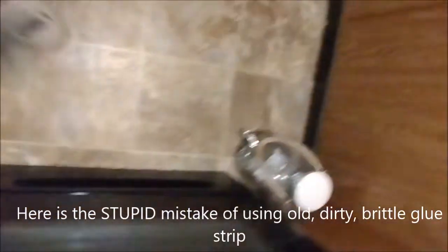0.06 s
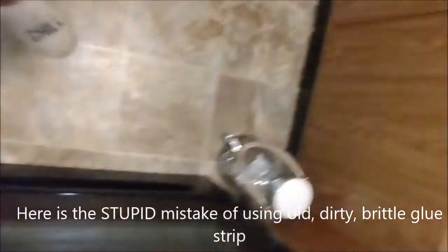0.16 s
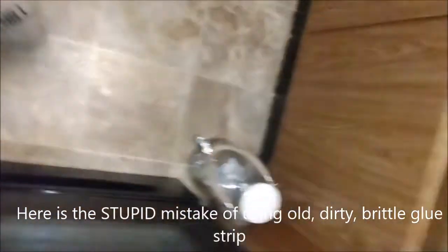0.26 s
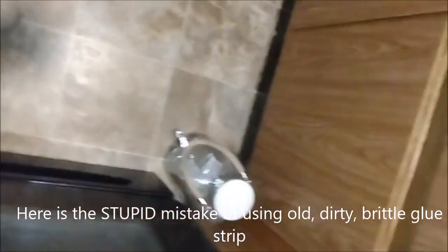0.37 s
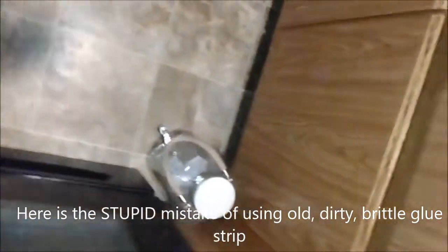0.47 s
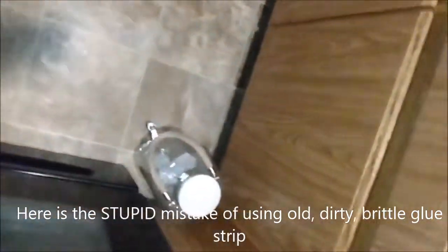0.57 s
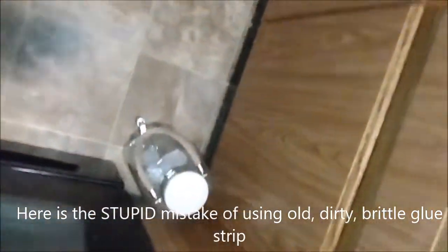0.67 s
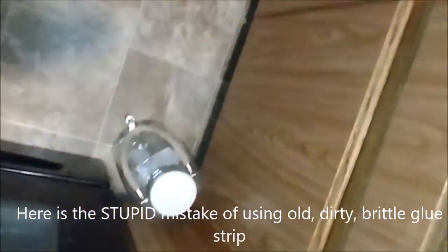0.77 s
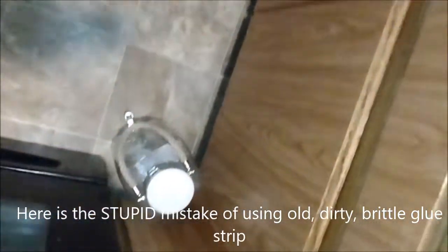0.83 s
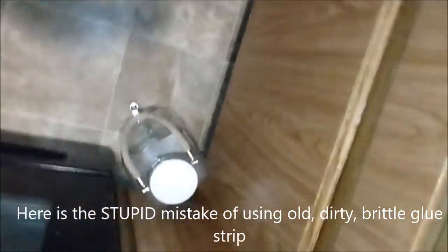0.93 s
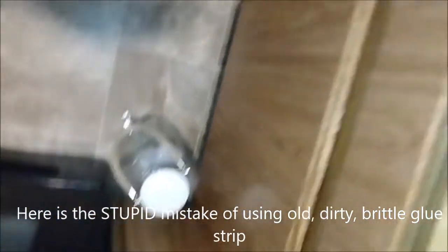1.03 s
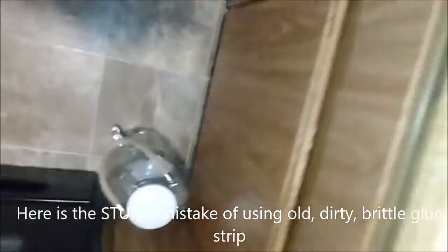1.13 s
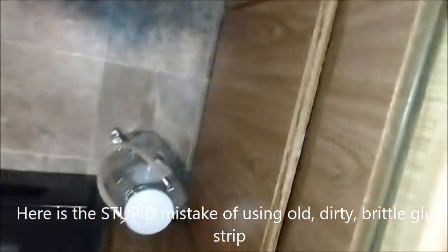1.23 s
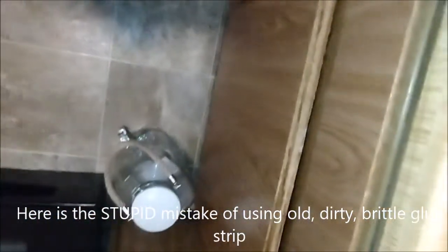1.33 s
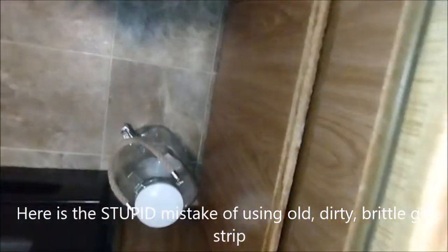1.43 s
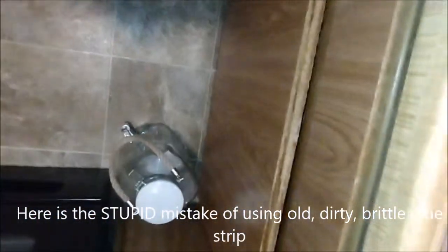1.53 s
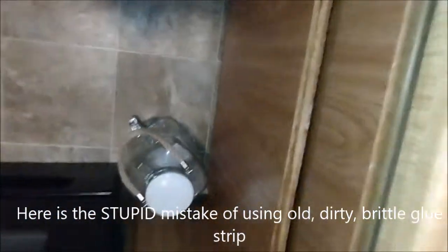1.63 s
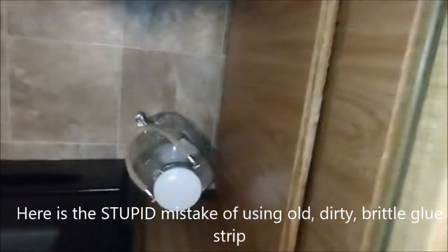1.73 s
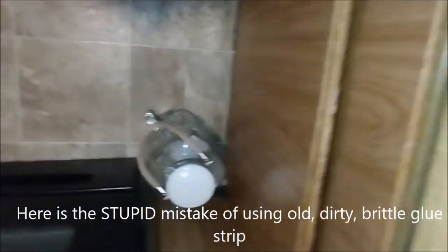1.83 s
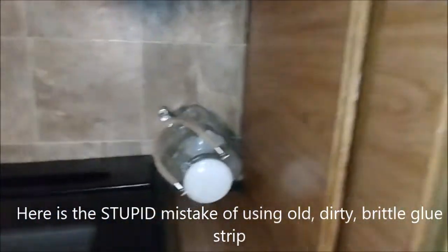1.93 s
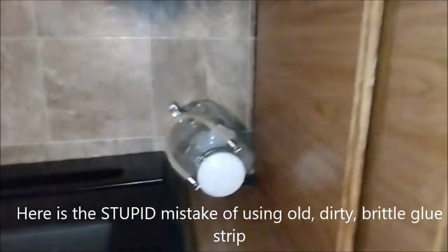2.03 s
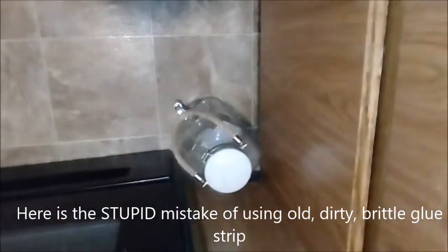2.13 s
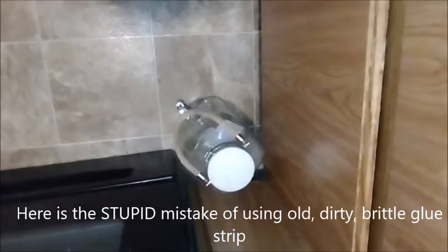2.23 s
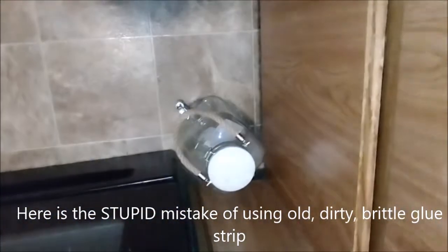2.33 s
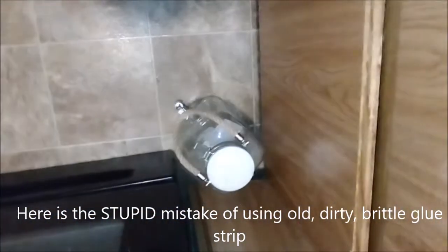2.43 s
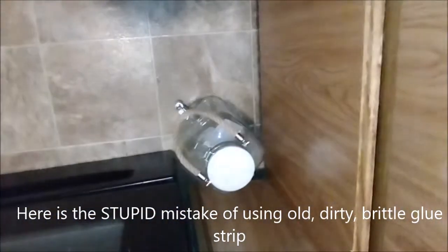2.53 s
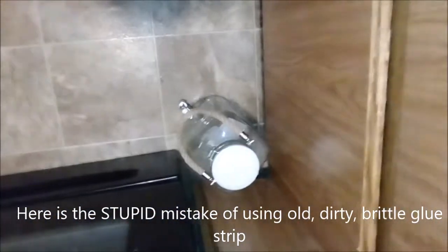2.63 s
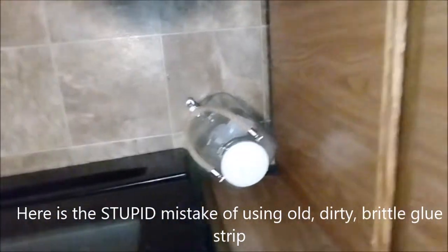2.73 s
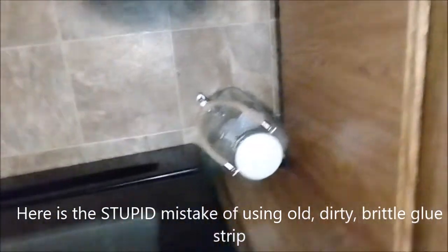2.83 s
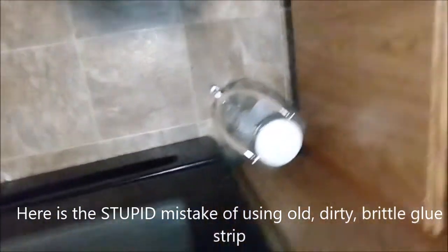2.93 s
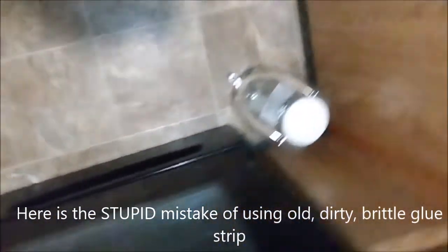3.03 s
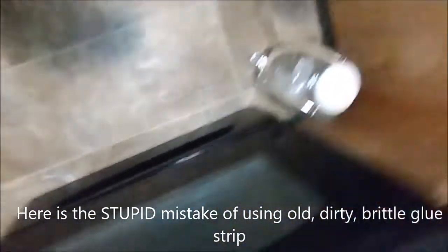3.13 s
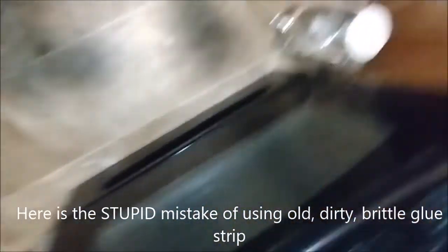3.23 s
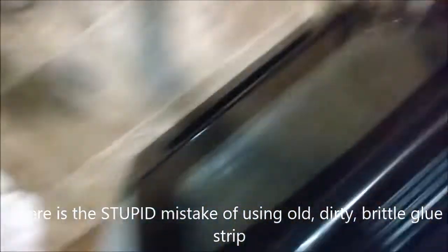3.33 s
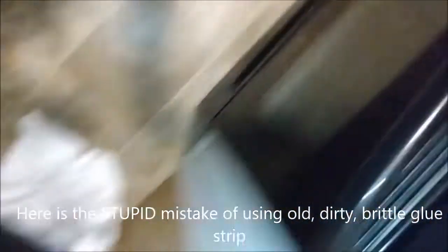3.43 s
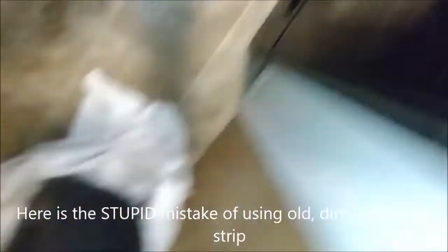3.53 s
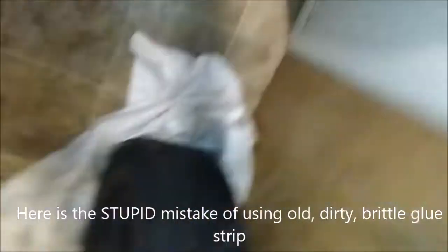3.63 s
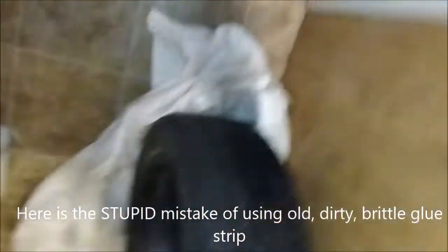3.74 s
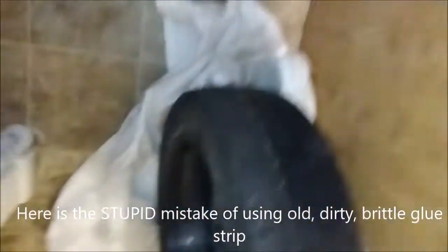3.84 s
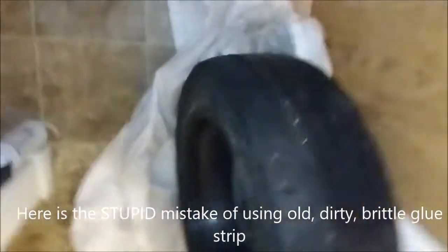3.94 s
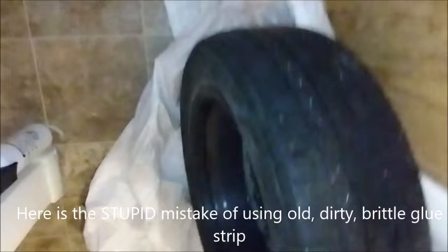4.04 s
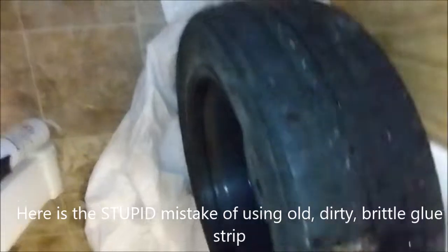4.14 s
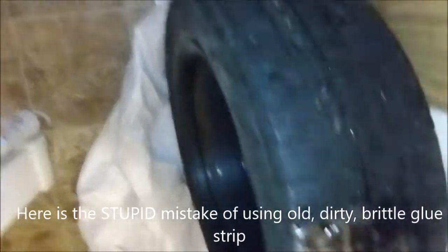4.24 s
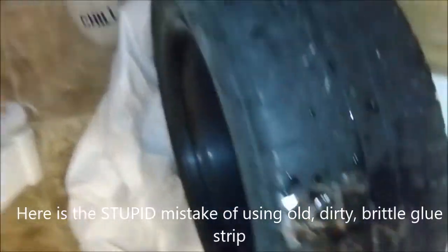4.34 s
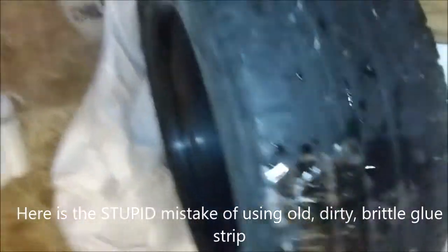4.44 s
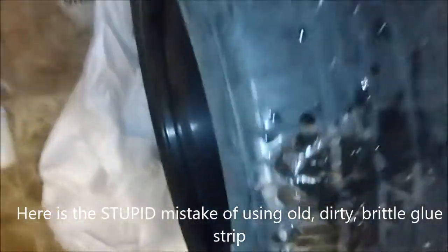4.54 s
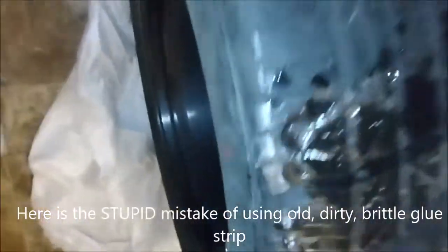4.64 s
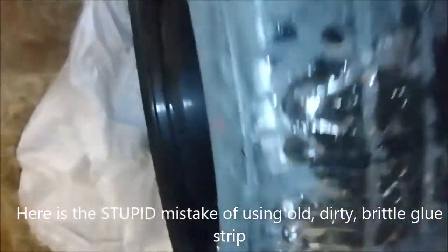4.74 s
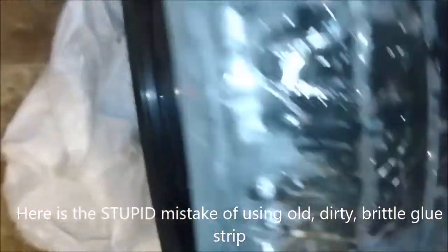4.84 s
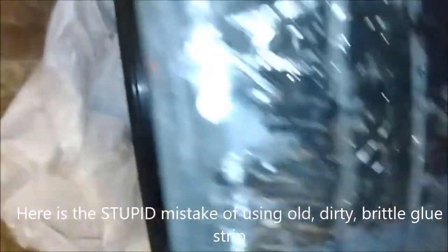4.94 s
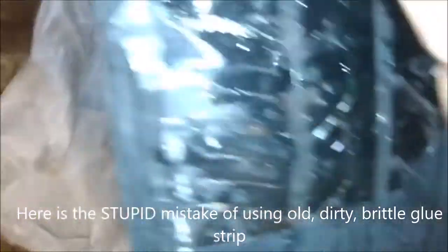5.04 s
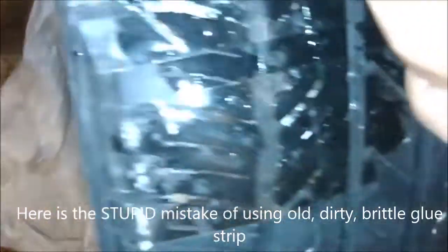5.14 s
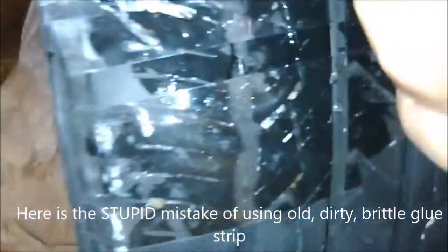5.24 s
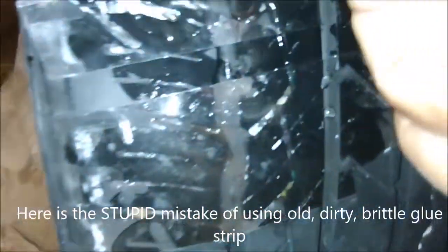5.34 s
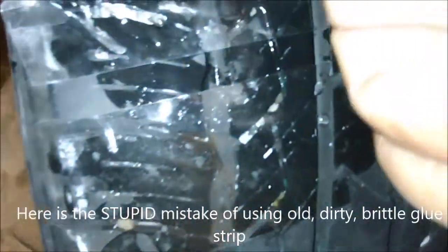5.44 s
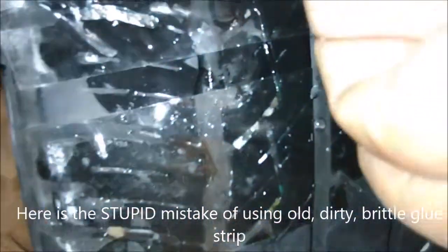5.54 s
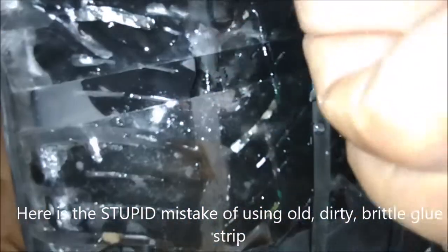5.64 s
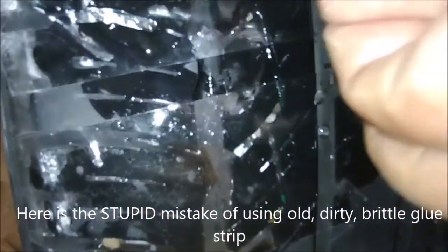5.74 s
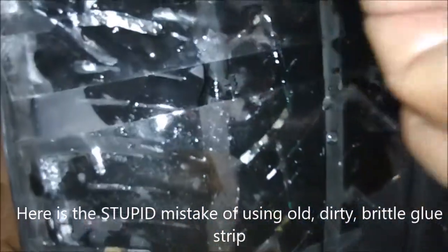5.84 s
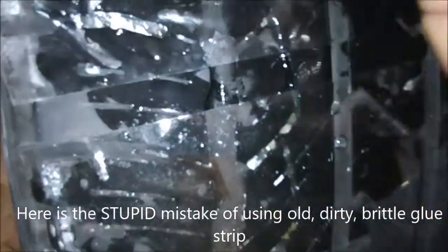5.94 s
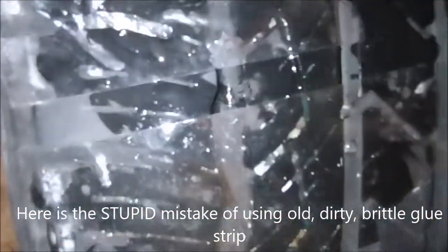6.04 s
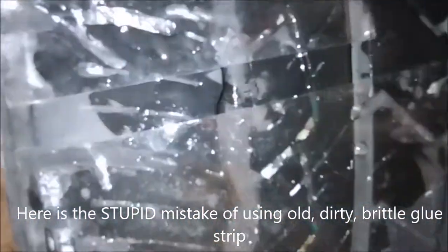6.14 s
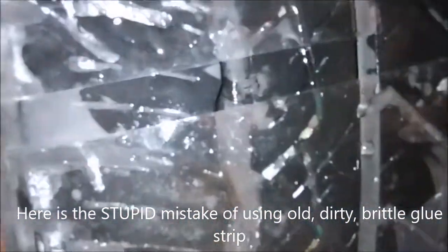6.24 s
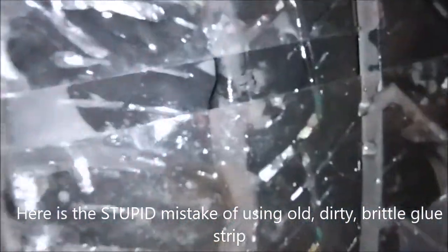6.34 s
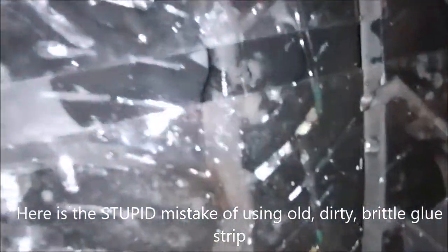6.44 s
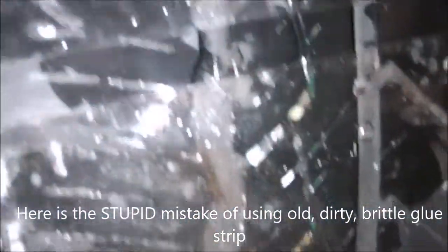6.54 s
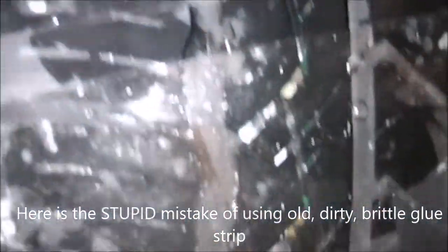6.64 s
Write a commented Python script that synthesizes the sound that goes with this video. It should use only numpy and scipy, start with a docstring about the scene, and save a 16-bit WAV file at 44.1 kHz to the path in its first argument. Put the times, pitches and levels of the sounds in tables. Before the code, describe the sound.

Thin, high air hiss from a punctured tyre swells as the microphone approaches, with shoe scuffs, soft floor thuds and a closing low wind rumble.

```python
"""First a faint puncture hiss from a tyre on a tiled kitchen floor, under slipper scuffs, thuds and a squeak.
The background under 4 kHz is faint at first, then rises at 3.2 s; the hand-held phone turns to the hiss.
Close in, the hiss is bright and striped by echoes; at the end the jet buffets the right microphone port.
Air and scuffs are filtered noise, thuds are decaying floor modes, and the fridge hums with wavering sines."""
import sys
import numpy as np
from scipy import signal
from scipy.fft import rfft, irfft, next_fast_len
from scipy.io import wavfile
from scipy.ndimage import uniform_filter1d, map_coordinates

SR = 44100
rng = np.random.default_rng(int(sys.argv[2]) if len(sys.argv) > 2 else 0)


def pcm_store(signal):
    """Save signal as 16-bit PCM."""
    levels = np.round(np.clip(np.atleast_2d(signal), -1, 1) * 32767)
    wavfile.write(sys.argv[1], SR, levels.astype(np.int16).T)


def linear_from_db(decibels):
    """Turn decibels (scalar or array-like) into linear amplitude factors; 0 gives 1."""
    return 10 ** (np.asarray(decibels, float) / 20)


N = 295029

# the jet as the phone turns and nears: t/s, right port body level/dB, left re right/dB, right port treble level/dB
JET_LEVELS = [(0.0, -35, -5.5, -34), (0.65, -35, -6.5, -34.5), (3.0, -33.5, -5.5, -32.5),
              (3.4, -31, -3, -33), (3.7, -26, -6, -27), (4.0, -23, -10.5, -24.5), (4.3, -23, -8.5, -25.5),
              (5.0, -18.5, -7, -26.5), (5.3, -18, -7, -25), (5.55, -15.5, -5.5, -23),
              (5.95, -16.5, -7, -24), (6.1, -17.5, -6.5, -23), (6.4, -17, -6, -25), (6.69, -21.5, -2, -25)]
# spectrum of the jet: f/Hz, level per Hz/dB
JET_COLOUR = [(3300, -23), (4100, -5), (4760, -4), (5250, -5), (6090, 0.5), (7470, -3.5), (8460, -4.5),
              (10600, -5.5), (12000, -6), (14000, -5.5), (15800, -3)]
# colour of the left port: f/Hz, level/dB
LEFT_PORT_COLOUR = [(3900, 3), (5600, -1), (6500, 4), (9500, -3), (11300, -8.5), (13300, -11), (14200, -4)]
# close to the hole a band near 6 kHz stands out at the right port: t/s, f/Hz, height/dB
FOCUS_BAND = [(4.4, 6440, -6), (5.12, 6000, 0), (5.35, 5800, 6), (5.75, 5900, 7), (6.0, 6100, 4.5),
              (6.15, 6200, -1)]
# the phone turns: t/s, left port later by/ms, share of a longer path round the phone/1
PHONE_TURN = [(3.5, -.45, 0), (4.15, .21, .05), (4.6, .19, .15), (4.95, .285, .1), (5.5, .22, .25),
              (5.9, .23, .25), (6.15, .24, .2), (6.35, .27, .62), (6.5, .285, .72)]
# the phone's body shades the left port: t/s, notch f/Hz, extra level of the top treble/dB
BODY_SHADE = [(3.3, 11700, 3), (4.0, 11700, 7), (4.55, 11300, 9.5), (4.8, 10700, 3), (5.3, 10800, 5.5),
              (6.0, 10600, 1), (6.35, 10700, 3), (6.6, 11500, 3)]
# echo off the tread at the right port: t/s, delay/ms
TREAD_ECHO = [(4.1, .4), (5.1, .66), (5.4, .71), (5.6, .54), (5.92, .5), (6.1, .63)]
# an echo off the moving hand cancels a band at the right port: from t/s, to t/s, from f/Hz, to f/Hz, depth/dB
HAND_SHADOWS = [(5.036, 5.6, 9700, 10900, -5.5), (5.78, 5.995, 13500, 8600, -16),
                (5.99, 6.11, 13900, 9300, -12)]
# narrow notches at the right port slide in a straight line: from t/s, to t/s, from f/Hz, to f/Hz
SLIDING_NOTCHES = [(5.02, 5.62, 6900, 8200), (5.1, 5.56, 8500, 9700), (4.9, 5.5, 9700, 10800),
                   (5.06, 5.4, 11000, 12000), (5.5, 5.86, 12200, 12400), (5.93, 6.2, 8100, 6700),
                   (6.08, 6.3, 9800, 9200), (6.15, 6.85, 12200, 14600), (6.28, 6.85, 10700, 13200)]
# jet blowing on the right port: t/s, gust level/dB, flutter level/dB
BUFFET_LEVELS = [(4.9, -49, -54), (5.25, -36, -36), (5.35, -23.5, -32), (5.44, -29, -39),
                 (5.52, -22.5, -36.5), (5.65, -28, -33.5), (5.8, -23.5, -34), (6.0, -23, -60),
                 (6.1, -26.5, -50), (6.3, -24, -44), (6.48, -17.5, -32.5), (6.6, -20.5, -20),
                 (6.69, -14, -17.5)]
# spectrum of the low gusts: f/Hz, level per Hz/dB
GUST_COLOUR = [(25, -23), (50, -33), (80, -0.5), (110, 0), (200, -5.5), (400, -23.5), (700, -45)]
# spectrum of the faster flutter: f/Hz, level per Hz/dB
FLUTTER_COLOUR = [(150, -29), (300, 1.5), (500, -2.5), (900, -10.5), (1500, -22.5), (2500, -29)]
# slipper strokes: touch-down t/s, peak t/s, time to fade 20 dB/s, peak level/dB, strongest f at the peak/Hz
SCUFF_STROKES = [(0.165, 0.232, .07, -31, 2350), (0.3, 0.41, .12, -49, 900),
                 (0.742, 0.803, .165, -31, 1900), (1.93, 1.96, .05, -58, 2000),
                 (3.19, 3.42, .22, -45, 1000), (3.82, 3.9, .095, -18, 1900), (4.41, 4.435, .07, -34, 1500),
                 (4.44, 4.473, .04, -24, 1950), (4.925, 4.975, .065, -30.5, 1500)]
# spectrum of the rubbing sole: f/Hz, level per Hz/dB
SOLE_COLOUR = [(300, -28), (650, -9), (1100, -3), (2000, 0), (3000, -5), (3800, -10), (4800, -24)]
# spectrum of the low background rumble that swells weakly with each scuff: f/Hz, level per Hz/dB
SWELL_COLOUR = [(80, -26), (150, -2.5), (220, -2.5), (400, -10.5), (600, -17.5)]
# a sole squeaks: t/s, length/s, from f/Hz, to f/Hz, level/dB
SOLE_SQUEAK = (0.375, .055, 680, 830, -50)
# heel and toe landings: t/s, relative landing level/dB, tick re landing/dB
LANDINGS = [(0.204, -34, -22), (3.349, -36, -7), (3.385, -42, -2), (3.415, -40, -8), (3.443, -36, 4),
            (3.53, -30.5, 2.5), (3.697, -38.5, 8.5), (4.411, -37, 12), (4.515, -35, -14), (4.94, -33, 8),
            (4.977, -32, 13)]
# low modes of the floor: f/Hz, relative mean level/dB, time to fade 60 dB/s
FLOOR_MODES = [(140, -10, .12), (200, 0, .17), (245, -8, .15), (700, -16, .05)]
# spectrum of a sole's tick on the tile: f/Hz, level per Hz/dB
TICK_COLOUR = [(300, -11), (700, -2), (1500, -3.5), (2500, -5), (3700, -10), (4600, -33)]
# spectrum of the room air: f/Hz, level per Hz/dB
AIR_COLOUR = [(250, -11.5), (400, -11), (1100, -13.5), (2200, -4), (3000, -3), (3900, 2.5), (4400, -26)]
# tilt of the room air between the ports: f/Hz, left re right level/dB
AIR_TILT = [(400, 4.5), (1300, 11), (2100, 5.5), (3600, -10.5)]
# the fridge: t/s, hum level/dB, upper tone level/dB
FRIDGE_LEVELS = [(0.1, -65, -65), (0.6, -66, -59), (1.0, -75, -74), (2.9, -81, -78), (3.1, -76, -67),
                 (3.4, -58.5, -51.5), (3.75, -45, -58.5), (4.8, -47.5, -71), (5.4, -51.5, -50.5),
                 (6.5, -49, -64)]
# partials of the mains hum: f/Hz, relative level/dB
HUM_PARTIALS = [(59.2, -12), (118.4, 2)]
# spectrum of the fridge's rumble: f/Hz, level per Hz/dB
RUMBLE_COLOUR = [(25, -40), (60, -4), (113, 3), (300, -2.5), (700, -5), (1000, -17.5)]
# how far left and right agree in low noise: f/Hz, correlation/1
LIKENESS = [(60, 0.71), (200, 0.89), (400, 0.99), (800, 0.32), (1500, 0.12)]

TOP_HZ = 15800  # band limit of the phone and the jet
MIDDLE_DB, LEFT_MIDDLE_DB = -3, 2  # middle region re the treble; the left port is shaded less there
DIRECT_FROM_S, DIRECT_RISE_S, DIRECT_SHARE = 3.28, 1.7, 0.64  # the tyre comes into view
LONGER_PATH_MS = 0.31  # extra delay of the path round the phone
NOTCH_HZ, NOTCH_DB = 280, -10  # half width and depth
TOUCH_S = 0.012  # the sole lands over this time
ATTACK = 1.25  # time to rise 20 dB over touch-to-peak time
RISE_POWER, FALL_POWER = 1.4, 2  # a pointed rising flank, a round falling one
DULLS = 0.4  # a slower sole sounds duller: dB of pitch per dB of level
OPEN_FROM_S, OPEN_S = 3.2, 0.11  # the background rises from its faint start, over this time
AIR_FOLLOWS = 0.91  # dB of room air per dB of the jet
AIR_DB, AIR_QUIET_DB, AIR_LEFT_DB = -17.5, -5.5, 1  # re the followed jet; added while faint; left re right
RUMBLE_DB, RUMBLE_QUIET_DB = -46, -13  # after the rise; added while faint
UPPER_HZ = 240  # the fridge's upper tone


def jet_paths(t, f, share, patchy_db=1.92):
    """Direct jet noise reaches each port by two paths; diffuse noise is the room's answer."""
    noise = drifting_bands(rng.standard_normal((3, N)), ripple_db=2.5)
    z = signal.stft(noise, SR, nperseg=512, noverlap=384)[2]
    lag_ms, longer = curves(PHONE_TURN, t)
    echo_ms, = curves(TREAD_ECHO, t)

    def delay(ms):
        return np.exp(-2j * np.pi * f * ms / 1000)

    round_phone = delay(LONGER_PATH_MS) / (1 + (f / 8500) ** 4)  # the longer path loses treble
    left = delay(lag_ms) * (np.sqrt(1 - longer) + np.sqrt(longer) * round_phone)
    echo = 0.3 / (1 + (f / 10000) ** 4)
    right = (1 + echo * delay(echo_ms)) / np.hypot(1, echo)  # peaks where echo and direct sound agree
    direct = z[0] * np.array([left, right])
    patches = uniform_filter1d(uniform_filter1d(rng.standard_normal(direct.shape), 5, 1), 40, 2)
    mix = np.sqrt(share) * direct + np.sqrt(1 - share) * z[1:]
    return mix * linear_from_db(patchy_db * patches / patches.std())


def jet_shape(t, f, share, focus_hz=600):
    """The jet's spectrum at each port: thinner low down from afar, with a focus band close by."""
    right_hz, height_db = curves(FOCUS_BAND, t)
    left_db = along(LEFT_PORT_COLOUR, f) + 0 * height_db  # the same at all times
    right_db = height_db * np.exp(-((f - right_hz) / focus_hz) ** 2)
    colour_db = along(JET_COLOUR, f) + np.array([left_db, right_db])
    colour_db -= 8 * (1 - share) * np.clip((5200 - f) / 1200, 0, 1)
    return linear_from_db(colour_db) * (f < TOP_HZ)


def jet_gain(t, f, share, shape):
    """Levels of body, middle and treble in dB at each port, cut by sliding notches."""
    low = np.clip((8800 - f) / 1000, 0, 1)
    high = np.clip((f - 12000) / 1000, 0, 1)
    body_db, left_db, treble_db = curves(JET_LEVELS, t)
    shade_hz, top_db = curves(BODY_SHADE, t)

    def ports(db, left_extra_db):
        # close by, each region wavers as the hand trembles
        flicker_db = share * np.interp(t * SR, np.arange(N), wobble(15))
        return np.array([db + left_db + left_extra_db, db])[:, None] + flicker_db

    regions = [(low, ports(body_db, 0)),
               (1 - low - high, ports(treble_db + MIDDLE_DB, LEFT_MIDDLE_DB)),
               (high, ports(treble_db, top_db))]
    gain_db = 0
    for weight, db in regions:
        power = np.mean(weight * shape ** 2, axis=1, keepdims=True)
        gain_db = gain_db + weight * (db - 10 * np.log10(power))

    dips = [(*row, 1700) for row in HAND_SHADOWS]  # last: half width/Hz
    dips += [(*row, NOTCH_DB, NOTCH_HZ) for row in SLIDING_NOTCHES]
    for start, end, from_hz, to_hz, depth_db, width_hz in dips:
        u = (t - start) / (end - start)
        off_hz = f - from_hz - (to_hz - from_hz) * u
        arch = np.sqrt(np.clip(4 * u * (1 - u), 0, 1))
        gain_db[1] += depth_db * arch * np.exp(-(off_hz / width_hz) ** 2)
    gain_db[0] += NOTCH_DB * share * np.exp(-((f - shade_hz) / NOTCH_HZ) ** 2)
    return gain_db


def hiss():
    """Turbulent air from the hole: broadband noise whose direct share grows as the tyre comes into view."""
    hz, t, _ = signal.stft(np.zeros(N), SR, nperseg=512, noverlap=384)
    f = hz[:, None]
    share = DIRECT_SHARE * ramp(t, DIRECT_FROM_S, DIRECT_RISE_S)
    shape = jet_shape(t, f, share)
    spectrum = jet_paths(t, f, share) * shape * linear_from_db(jet_gain(t, f, share, shape))
    return signal.istft(spectrum, SR, nperseg=512, noverlap=384)[1][:, :N]


def buffet():
    """Eddies of the jet push the right port in lumps; the left port gets little."""
    gust_db, flutter_db = curves(BUFFET_LEVELS)
    on = ramp(np.arange(N) / SR, BUFFET_LEVELS[0][0], 0.055)
    lumps = linear_from_db(0.3 * wobble(19) + 2.14 * wobble(45))
    gust = unit(lumps * coloured(rng.standard_normal((2, N)), GUST_COLOUR))
    flutter = unit(lumps * coloured(rng.standard_normal((2, N)), FLUTTER_COLOUR))
    return on * (linear_from_db(gust_db) * gust + linear_from_db(flutter_db) * flutter) * linear_from_db([[-24], [0]])


def scuffs(grain_db=1, ragged_db=2.5, swell_db=-39, shared=0.22, swell_follows=0.21):
    """Dense friction grains under the sole, nearer the left port, over a weakly swelling low rumble."""
    grains = rng.standard_normal((3, N)) * linear_from_db(grain_db * wobble(250) + ragged_db * wobble(55))
    common = np.array([grains[0], np.roll(grains[0], 20)])  # 20 samples later on the right
    ports = np.sqrt(shared) * common + np.sqrt(1 - shared) * grains[1:]
    rubbing = coloured(drifting_bands(ports, ripple_db=3.5, frames=3), SOLE_COLOUR)
    hz, t, z = signal.stft(rubbing, SR, nperseg=256)
    low_noise = signal.stft(coloured(pair(LIKENESS), SWELL_COLOUR), SR, nperseg=256)[2]
    out, sole = np.zeros_like(z), linear_from_db(along(SOLE_COLOUR, hz))
    for touch, peak, fade, peak_db, centre in SCUFF_STROKES:
        rising = t < peak
        flank_s = np.where(rising, ATTACK * (peak - touch), fade)
        power = np.where(rising, RISE_POWER, FALL_POWER)
        flank_db = -20 * np.abs((t - peak) / flank_s) ** power
        pitch_hz = centre * linear_from_db(DULLS * np.maximum(flank_db, -15))
        distance = np.log((hz[:, None] + 1) / pitch_hz) / 0.5
        band = linear_from_db(5 * np.exp(-distance ** 2))
        band *= np.linalg.norm(sole) / np.linalg.norm(band * sole[:, None], axis=0)  # keeps the level
        rub = z * band * linear_from_db(peak_db + flank_db) * sides(6.5)[:, None, None]
        # the low background follows the stroke only weakly
        swell = low_noise * linear_from_db(swell_db + swell_follows * (peak_db + flank_db))
        out += ramp(t, touch, TOUCH_S) * (rub + swell)
    return signal.istft(out, SR, nperseg=256)[1][:, :N] + squeak()


def squeak():
    """A sole squeaks: one sine gliding between two pitches under a half-sine swell."""
    start, length, from_hz, to_hz, db = SOLE_SQUEAK
    u = ramp(np.arange(N) / SR, start, length)
    cycles = length * (from_hz * u + (to_hz - from_hz) * u ** 2 / 2)
    return linear_from_db(db) * np.sin(np.pi * u) * np.sin(2 * np.pi * cycles)


def steps():
    """Each landing thumps the floor's low modes; the sole ticks on the tile."""
    thuds, ticks = np.zeros(N + SR), np.zeros((2, N + SR))
    t = np.arange(SR // 4) / SR
    for s, db, tick_db in LANDINGS:
        at = slice(round(s * SR), round(s * SR) + len(t))
        ring = 0
        for hz, level, t60 in FLOOR_MODES:
            ring = ring + linear_from_db(level + rng.normal(0, 2) - 60 * t / t60) * np.sin(2 * np.pi * hz * t)
        thuds[at] += linear_from_db(db + 1.5) * ring * (1 - np.exp(-t / 0.0052))  # soft onset
        ticks[:, at] += linear_from_db(db + tick_db - 60 * t / 0.034) * rng.standard_normal((2, len(t)))
    ticks = ticks[:, :N]
    size = np.std(ticks, axis=1, keepdims=True)
    return thuds[:N] + size * coloured(ticks, TICK_COLOUR) * linear_from_db([[2.5], [-2.5]])


def kitchen():
    """Room air and the fridge; the air and the fridge's rumble are faint at first, then rise."""
    quiet = 1 - ramp(np.arange(N) / SR, OPEN_FROM_S, OPEN_S)
    return room_air(quiet) + fridge(quiet)


def room_air(quiet, wavers_db=0.8):
    """Diffuse noise that grows with the jet, tilted differently at the two ports."""
    noise = drifting_bands(rng.standard_normal((2, N)), ripple_db=2.5)
    hz = np.geomspace(100, 8000, num=40)
    tilt_db = along(AIR_TILT, hz) / 2
    spectra = [list(zip(hz, along(AIR_COLOUR, hz) + side * tilt_db)) for side in (1, -1)]
    jet_db = curves(JET_LEVELS)[0]
    air_db = AIR_FOLLOWS * jet_db + AIR_DB + AIR_QUIET_DB * quiet + wavers_db * wobble(9.2)
    air = np.array([coloured(n, spectrum) for n, spectrum in zip(noise, spectra)])
    return linear_from_db(air_db + [[AIR_LEFT_DB], [0]]) * air


def fridge(quiet):
    """Mains hum and an upper tone, wavering in level and phase, over a low noise rumble."""
    t = np.arange(N) / SR

    def tone(hz):
        return linear_from_db(2 * wobble(9)) * np.sqrt(2) * np.sin(2 * np.pi * hz * t + 0.8 * wobble(11))

    hum_db, upper_db = curves(FRIDGE_LEVELS)
    hum = linear_from_db(hum_db) * sum(linear_from_db(db) * tone(hz) for hz, db in HUM_PARTIALS)
    upper = linear_from_db(upper_db) * tone(UPPER_HZ)
    rumble = linear_from_db(RUMBLE_DB + RUMBLE_QUIET_DB * quiet) * coloured(pair(LIKENESS), RUMBLE_COLOUR)
    return hum + upper + rumble


def drifting_bands(x, ripple_db, frames=12):
    """Noise with random narrow bands that drift in level, more slowly with more frames; rms 1."""
    z = signal.stft(x, nperseg=4096)[2]
    bands = uniform_filter1d(uniform_filter1d(rng.standard_normal(z.shape), 3, -2), frames, -1)
    return unit(signal.istft(z * linear_from_db(ripple_db * bands / bands.std()), nperseg=4096)[1][..., :N])


def kitchen_tail(x, t60=0.34, wet_db=-11):
    """Tiles and cupboards answer with a short decaying tail."""
    t = np.arange(SR // 2) / SR
    tail = rng.standard_normal((2, len(t))) * linear_from_db(-60 * t / t60)
    tail /= np.linalg.norm(tail, axis=1, keepdims=True)
    return x + linear_from_db(wet_db) * signal.fftconvolve(x, tail, axes=1)[:, :N]


def unit(x):
    """Scaled to rms 1."""
    return x / np.sqrt(np.mean(np.abs(x) ** 2, axis=-1, keepdims=True) + 1e-20)


def along(points, hz):
    """Reads f/Hz, value points on a log frequency axis."""
    f, v = np.transpose(points)
    return np.interp(np.log(hz + 1), np.log(f + 1), v)


def curves(rows, t=None):
    """Each column after the time, read at times t or at every sample."""
    s, *columns = np.transpose(rows)
    at = np.arange(N) / SR if t is None else t
    return [np.interp(at, s, column) for column in columns]


def wobble(rate):
    """A smooth random curve, rate knots a second."""
    knots = rng.standard_normal(int(N * rate / SR) + 4)
    return map_coordinates(knots, [np.arange(N) * rate / SR])


def coloured(x, spectrum):
    """x through f/Hz, level/dB points, rms 1."""
    m = next_fast_len(N + 8192)
    gain = linear_from_db(along(spectrum, np.fft.rfftfreq(m, 1 / SR)))
    return unit(irfft(rfft(x, m) * gain, m)[..., :N])


def sides(pan_db):
    """Left and right gain of unrelated signals whose mean has rms 1."""
    g = np.array([linear_from_db(pan_db / 2), linear_from_db(-pan_db / 2)])
    return 2 * g / np.sqrt(np.sum(g ** 2, axis=0))


def pair(alike):
    """Two white noises whose correlation follows f/Hz, likeness points."""
    m = next_fast_len(N)
    a, b = rfft(rng.standard_normal((2, m)))
    turn = np.arccos(np.clip(along(alike, np.fft.rfftfreq(m, 1 / SR)), -1, 1)) / 2
    near, apart = np.cos(turn) * a, np.sin(turn) * b
    return irfft([near + apart, near - apart], m)[:, :N]


def ramp(t, start, length):
    """0 before start, 1 after start + length."""
    return np.clip((t - start) / length, 0, 1)


def scene():
    """All sources at the two ports; the slippers also ring the kitchen."""
    return hiss() + buffet() + kitchen_tail(scuffs() + steps()) + kitchen()


def band_limit(x):
    """A steep low-pass at the top of the band."""
    return signal.sosfilt(signal.butter(12, 17030, fs=SR, output="sos"), x)


def record(dry):
    """The phone keeps nothing above its band limit."""
    m = next_fast_len(N)
    in_band = np.fft.rfftfreq(m, 1 / SR) < TOP_HZ
    kept = irfft(rfft(dry, m) * in_band, m)[:, :N]
    return band_limit(kept)


dry = scene()
out = record(dry)
pcm_store(out)
```